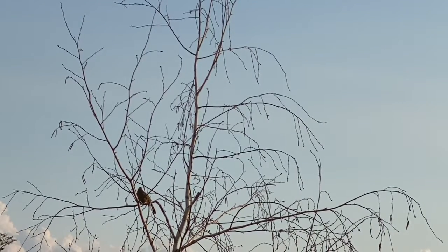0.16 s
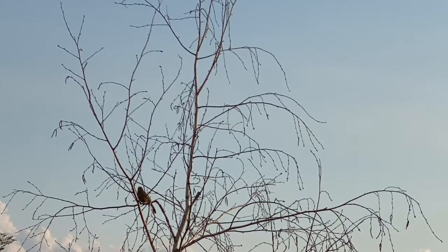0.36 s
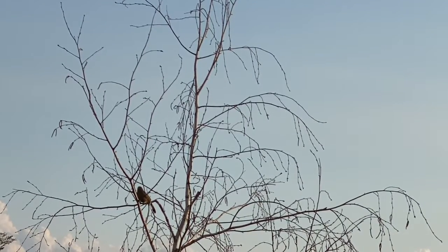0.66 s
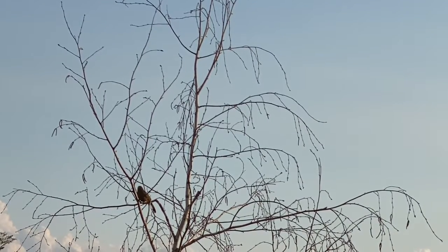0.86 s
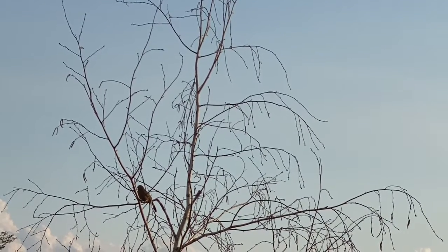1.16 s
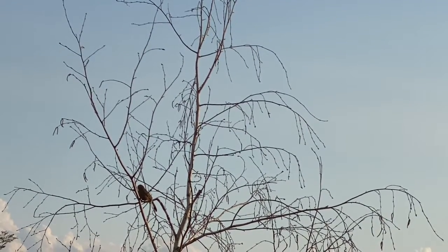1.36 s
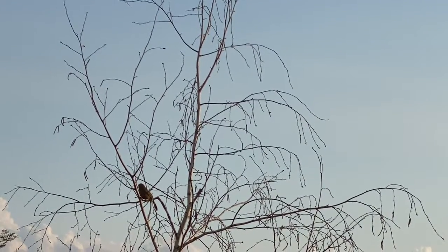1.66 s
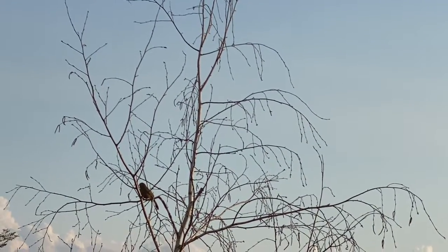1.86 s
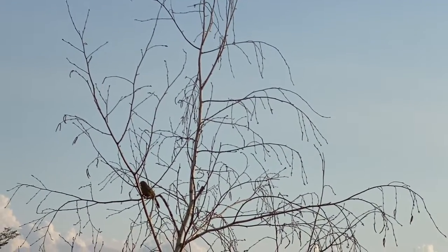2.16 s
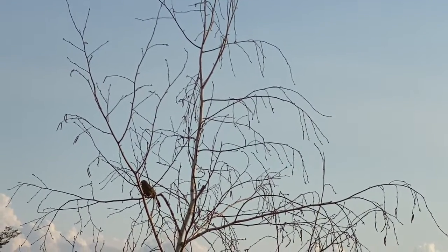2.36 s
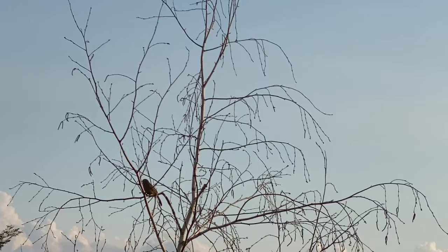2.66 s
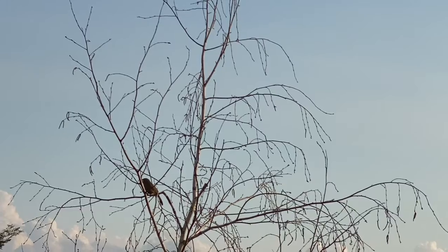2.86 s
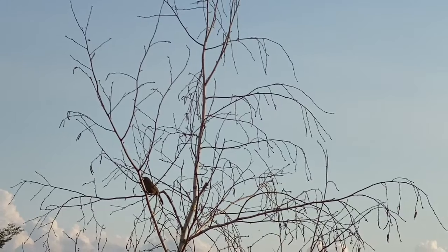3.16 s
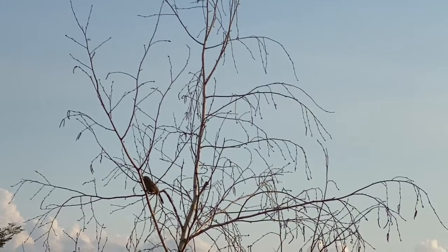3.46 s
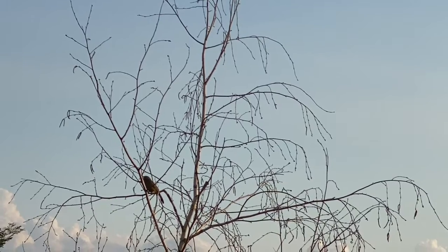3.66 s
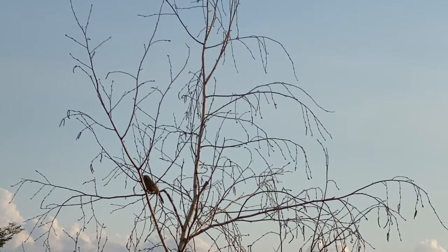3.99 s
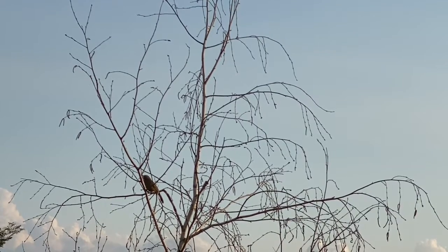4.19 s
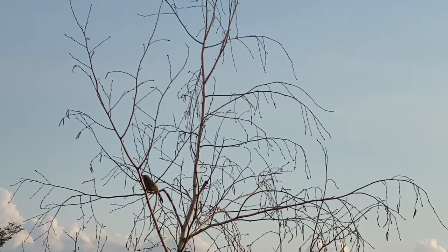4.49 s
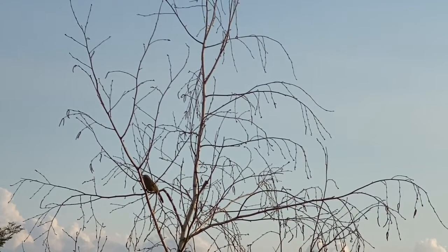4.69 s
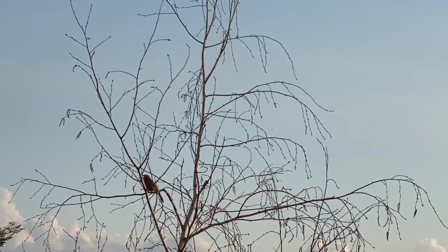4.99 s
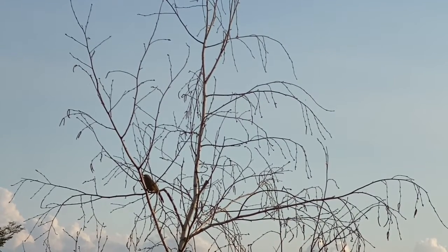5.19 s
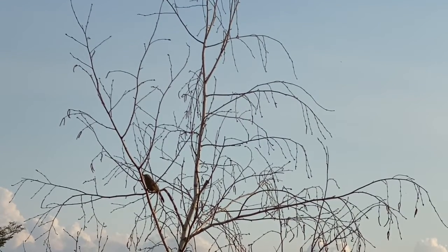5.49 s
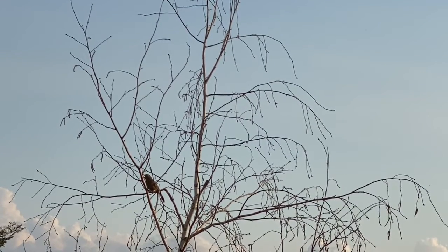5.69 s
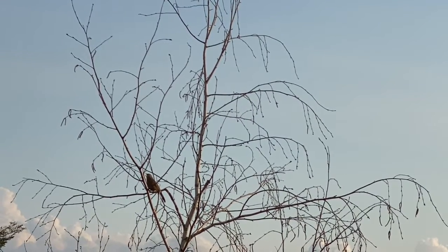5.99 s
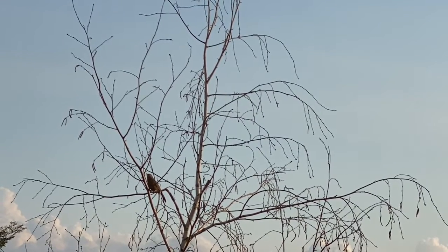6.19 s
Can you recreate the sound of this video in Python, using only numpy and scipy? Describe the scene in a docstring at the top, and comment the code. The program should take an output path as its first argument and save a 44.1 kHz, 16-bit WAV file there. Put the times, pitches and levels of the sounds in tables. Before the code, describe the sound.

A songbird in a bare tree sings one growing bout of buzzes, slurs and warbles, then loud clear whistles, over faint low traffic rumble.

```python
"""Songbird in a bare tree

One bout grows louder: two buzzes, six slur-slur-warble phrases, two quavers around a buzz, then long whistles
and steep down-sweeps. Each note is a near sine drawn along a pitch curve, with overtones and trills. Ground,
branches and nearby walls echo it. Noise makes the far traffic rumble and a single twig tick; unsteady tones
make the far engines, and thin glides the other birds and a faint high whine."""
import sys
import numpy as np
from scipy import signal
from scipy.fft import rfft, irfft, next_fast_len
from scipy.io import wavfile
from scipy.ndimage import uniform_filter1d

SR = 44100
rng = np.random.default_rng(int(sys.argv[2]) if len(sys.argv) > 2 else 0)


def inscribe(sig):
    """Save sig as 16-bit PCM at rate SR to the path in sys.argv[1].

    A 1-D sig is mono; a 2-D sig holds one channel per row.
    Samples are clipped to [-1, 1] before scaling.
    """
    pcm = np.round(np.clip(np.atleast_2d(sig).T, -1, 1) * 32767)
    wavfile.write(sys.argv[1], SR, pcm.astype(np.int16))


N = 279593
TIME = np.arange(N) / SR

# Source levels are set before swells, throbs and flutter; birds and twig also before echoes and port colour.

# distant traffic and hiss: (frequency [Hz], relative density [dB])
AIR_SPECTRUM = [(15, -44.5), (25, -9), (82, -5.5), (129, -8), (297, -14), (359, -14), (523, -18.5),
                (1110, -30), (2630, -26), (3260, -34.5), (6550, -45), (7300, -45), (11800, -84.5),
                (13500, -47.5), (15500, -44)]
# width of that background: (frequency [Hz], side relative to mid [dB])
AIR_WIDTH = [(60, -23), (200, -8), (400, -8.5), (800, -0.5), (2400, -7.5), (15000, -21.5)]
# idling engines far off, each fading over the last second before its end:
# (pitch [Hz], level [dB], time by which it has faded [s])
IDLING_ENGINES = [(67.5, -61.5, 9), (193, -70.5, 3.7), (295, -66.5, 3.4)]
# a distant engine swells and eases off:
# (start [s], end [s], starting pitch [Hz], final pitch [Hz], level [dB])
REVVING_ENGINES = [(1.207, 1.718, 252, 218.7, -58), (3.167, 3.328, 238, 233, -58.5),
                   (3.272, 3.737, 222, 183.5, -50.5), (4.315, 4.59, 240, 224, -58.5),
                   (4.797, 5.162, 198, 206, -57)]
# faint high sounds: a thin, nearly steady whine near 6.5 kHz, then calls of other birds: # (start [s], end [s],
# starting pitch [Hz], final pitch [Hz], level [dB], pitch scatter [ratio])
FAINT_HIGH_SOUNDS = [(0.729, 1.391, 6500, 6820, -89.5, 0), (1.631, 1.764, 6760, 4280, -64, 0.05),
                     (3.558, 3.714, 3820, 4790, -67.5, .05), (3.982, 4.116, 4210, 6580, -65.5, 0.14),
                     (4.089, 4.323, 6800, 6250, -76, .05), (5.664, 5.776, 3470, 3150, -68.5, 0.06),
                     (6.152, 6.344, 3620, 3930, -66, 0.02)]

# early echoes off ground and branches: (delay [s], level [dB])
EARLY_ECHOES = [(.0069, -13), (.0139, -18), (.0172, -18), (.0277, -21)]
# treble colour of the microphone ports; the first and last gains carry on outwards: (frequency [Hz], gain [dB])
PORT_COLOUR = [(4500, 4.5), (5400, -3.5), (7500, 2.5), (8500, -2), (10800, 7), (12300, -11.5),
               (13700, 11.5), (15500, 1.5)]

# overtones of pure whistles, quavers, squeaks and faint high sounds: (multiple of the pitch [ratio], level
# [dB])
CLEAN_OVERTONES = [(2, -31.5), (3, -37), (4, -55), (5, -47.5), (6, -41), (7, -40)]
# overtones of buzzes, slurs and warbles: (multiple of the pitch [ratio], level [dB])
SOFT_OVERTONES = [(2, -30), (3, -42), (4, -56), (5, -46.5), (6, -52)]
# overtones of forced notes, where half multiples join in: (multiple of the pitch [ratio], level [dB])
FORCED_OVERTONES = [(1.5, -34), (2, -25.5), (2.5, -39.5), (3, -33), (3.5, -47), (4, -45)]

# short falling slurs: (start [s], end [s], starting pitch [Hz], level [dB])
SLURS = [(.843, .89, 2610, -54.5), (.943, 1.028, 2947, -48), (1.212, 1.27, 3060, -47),
         (1.383, 1.467, 3020, -48), (1.651, 1.713, 3217, -45), (1.767, 1.843, 3000, -45),
         (2.086, 2.156, 3130, -44), (2.217, 2.298, 2923, -45), (2.49, 2.543, 3160, -41),
         (2.603, 2.696, 2938, -42.5), (2.902, 2.961, 3228, -38.5), (3.024, 3.097, 3040, -39)]
# buzzes: (start [s], end [s], starting pitch [Hz], top pitch [Hz], sag after the top [0-1], trill rate [Hz],
# trill depth at start [Hz], trill depth at end [Hz], level [dB])
BUZZES = [(.165, .27, 1835, 2730, .1, 182.3, 150, 220, -44.5),
          (.452, .579, 1864, 2588, .08, 159.2, 149, 283, -43),
          (3.702, 3.857, 2710, 3410, 0.17, 131.3, 180, 22, -32.5)]
# warbles: (start [s], end [s], starting pitch [Hz], top pitch [Hz], sag after the top [0-1],
# final trill depth [Hz], level [dB])
WARBLES = [(1.02, 1.141, 2400, 3744, 0.17, 110, -47), (1.461, 1.604, 2625, 3767, 0.13, 25, -44),
           (1.846, 2.016, 2490, 3872, 0.21, 30, -43.5), (2.295, 2.432, 2586, 3658, 0.07, 140, -42),
           (2.693, 2.842, 2720, 3696, 0.06, 130, -41.5), (3.096, 3.266, 2433, 3646, 0.09, 80, -37)]
# quavers: (start [s], end [s], starting pitch [Hz], trill rate at start [Hz], trill rate at end [Hz], level [dB])
QUAVERS = [(3.328, 3.634, 3135, 13.5, 36.5, -35.5), (3.911, 4.199, 3019, 23.5, 26.75, -35.5)]
# rising whistles: (start [s], end [s], starting pitch [Hz], pitch aimed at [Hz], level [dB])
RISES = [(4.726, 4.839, 2320, 3042, -39), (5.558, 5.67, 1775, 2877, -37)]
# high held whistles: (start [s], end [s], reference pitch [Hz], level [dB])
HOLDS = [(4.88, 5.046, 3822, -37), (5.733, 5.843, 4547, -35.5)]
# long arched whistles: (start [s], end [s], starting pitch [Hz], top pitch [Hz], level [dB])
ARCHES = [(5.152, 5.377, 2417, 2999, -34), (5.983, 6.214, 2810, 3044, -33)]
# low whistles: (start [s], end [s], starting pitch [Hz], level [dB], fade [dB/s])
LOWS = [(4.334, 4.567, 2383, -39, 24), (5.422, 5.564, 2020, -39.5, 162), (6.253, 6.345, 2078, -36, 134)]
# steep down-sweeps: (start [s], end [s], starting pitch [Hz], level [dB], level of the opening squeak [dB])
SWEEPS = [(4.64, 4.693, 4145, -40, -72), (5.078, 5.126, 4215, -36, -48.5), (5.88, 5.935, 4385, -33, -51.5)]

# Swells below run from the start to the end of a note [dB]; drops are shares of the pitch.
FULL_EFFORT_DB = -35  # note level at which overtones have their listed strength
SLUR_DROP, SLUR_SETTLE_S, SLUR_SWELL_DB = .235, .07, (-2.5, 0.5, -6.5)
BUZZ_CREST, BUZZ_SWELL_DB = .58, (-14.5, -2, 0, -1)  # crest: share of the length at which it tops out
WARBLE_CLIMB_S, WARBLE_SWELL_DB = .08, (-1, -0.5, .5, 3)
# the warble's trill quickens from start to end, and narrows from a wide opening swing
WARBLE_RATE_HZ, WARBLE_DEPTH_HZ, WARBLE_NARROW_S = (66, 89), 322, 0.13
QUAVER_DROP, QUAVER_SETTLE_S, QUAVER_SWELL_DB = .225, .27, (-4.5, -2, -3, -6.5)
QUAVER_DEPTH_HZ = (125.7, 145.3)  # trill depth at start and end
RISE_S, RISE_SWELL_DB = .052, (-11.5, -1, 1, -1.5)  # time constant of the rise
# a held whistle settles from above, then lifts a little: ratios to its reference pitch
HOLD_SHAPE, HOLD_SWELL_DB = (1.112, 1.035, 1, 1.018, 1.025), (-7.5, 0, 2, 3.5)
ARCH_CLIMB_S, ARCH_FALL_S, ARCH_DROP, ARCH_SWELL_DB = .056, 0.13, .243, (-7, 0, -0.5, -3, -8)
LOW_ATTACK_S, LOW_ONSET_DB, LOW_FALL_S, LOW_DROP = 0.031, -11, .133, .188
SWEEP_DROP, SWEEP_BEND, SWEEP_SWELL_DB = 0.38, 1.25, (-26.5, -3.5, 3.5, -4)
SQUEAK_HZ, SQUEAK_LEAD_S, SQUEAK_S = 5050, 0.0057, 0.016
FAR_SWELL_DB = (-4, 3, -3)


def undb(db):
    """Amplitude ratio of a level in dB."""
    return 10 ** (np.asarray(db) / 20)


def unit(x):
    """Scale a sound to rms 1."""
    return x / np.sqrt(np.mean(x ** 2))


def smooth(noise, size):
    """Noise averaged twice over some samples; rms 1."""
    return unit(uniform_filter1d(uniform_filter1d(noise, size), size))


def walk(rate):
    """Random levels held 1 / rate s and slewed twice; spread near 1."""
    hold_samples = int(SR / rate)
    steps = np.repeat(rng.standard_normal(N // hold_samples + 1), hold_samples)
    return 1.29 * uniform_filter1d(uniform_filter1d(steps, hold_samples), hold_samples)[:N]


def on_log_axis(hz, points):
    """Read (frequency [Hz], value) points on a log-frequency axis."""
    at, value = np.transpose(points)
    return np.interp(np.log(hz + 1), np.log(at), value)


def colour(x, points):
    """Filter a sound by a (frequency [Hz], gain [dB]) spectrum."""
    size = next_fast_len(len(x))
    gain = undb(on_log_axis(np.fft.rfftfreq(size, 1 / SR), points))
    return irfft(rfft(x, size) * gain, size)[:len(x)]


def add(track, start, sound):
    """Mix a sound into the track from a given time."""
    i = int(start * SR)
    track[i:i + len(sound)] += sound[:len(track) - i]


def clock(length_s):
    """Time since the start of a sound."""
    return np.arange(int(length_s * SR)) / SR


def spread(t, values):
    """Values spread evenly over a note and joined by straight lines."""
    return np.interp(t, np.linspace(0, t[-1], len(values)), values)


def settle(t, time_s):
    """From 0 to 1, fast at first and then levelling out."""
    return 1 - (1 - np.minimum(t / time_s, 1)) ** 2


def ease(t, time_s):
    """From 0 to 1, gentle at both ends."""
    return np.sin(np.pi / 2 * np.clip(t / time_s, 0, 1)) ** 2


def air(level_db=-57, swell_db=1.14):
    """Traffic rumble and a hiss that rises above 13 kHz: coloured noise, gently swelling, the deep bass nearly
    mono."""
    mid, side = (unit(colour(rng.standard_normal(N), AIR_SPECTRUM)) for _ in range(2))
    side = colour(side, AIR_WIDTH)
    return undb(level_db + swell_db * walk(3.496)) * np.array([mid + side, mid - side])


def unsteady_tone(hz, db, waver=.007, flutter_db=3):
    """A sine whose pitch wavers and whose level flutters at random."""
    phase = 2 * np.pi * np.cumsum(hz * (1 + waver * walk(25))) / SR
    return np.sqrt(2) * undb(db + flutter_db * walk(11)) * np.sin(phase)


def engines():
    """Far engines: only their lowest lines carry, wavering on the way."""
    out = sum(unsteady_tone(hz, db) * np.clip(until - TIME, 0, 1) for hz, db, until in IDLING_ENGINES)
    for start, end, from_hz, to_hz, db in REVVING_ENGINES:
        along = np.clip((TIME - start) / (end - start), 0, 1)
        tone = unsteady_tone(from_hz + (to_hz - from_hz) * along, db)
        out = out + tone * np.sin(np.pi * along) ** 2
    return out


def note(hz, db, flick=0, jitter=.003, rasp=0, partials=CLEAN_OVERTONES):
    """One note of the syrinx: a near sine that follows a pitch and a level, with overtones that grow with effort."""
    t = np.arange(len(hz)) / SR
    left = t[-1] - t
    wobble, flutter = rng.standard_normal((2, SR))
    # the membranes slacken as the note stops, so the pitch flicks down
    unsteadiness = 1 + jitter * smooth(wobble, size=50)[:len(t)]
    hz = hz * unsteadiness * (1 - flick * np.exp(-left / 0.0034))
    phase = 2 * np.pi * np.cumsum(hz) / SR
    # overtones past the top of the digital band are left out
    overtones = sum(undb(part_db) * (k * hz < SR / 2) * np.sin(k * phase) for k, part_db in partials)
    effort = undb(0.41 * (db - FULL_EFFORT_DB))
    # uneven closures smear the overtones into a rasp and leave the pitch itself clean
    roughness = 1 + rasp * smooth(flutter, size=20)[:len(t)]
    envelope = undb(db) * ease(t, 0.0087) * ease(left, .007)
    return np.sqrt(2) * envelope * (np.sin(phase) + overtones * effort * roughness)


def faint_high_sounds():
    """Faint thin glides, each pitch levelling out towards its end."""
    calls = np.zeros(N)
    for start, end, from_hz, to_hz, db, scatter in FAINT_HIGH_SOUNDS:
        t = clock(end - start)
        hz = from_hz + (to_hz - from_hz) * settle(t, t[-1])
        add(calls, start, note(hz, db + spread(t, FAR_SWELL_DB), jitter=scatter))
    return calls


def twig(at=1.608, db=-44, decay_s=0.0015):
    """A dry tick: coloured noise that dies away within milliseconds."""
    t = np.arange(SR // 20) / SR
    crack = colour(rng.standard_normal(len(t)), [(400, 0), (1300, 15.0), (2500, 19), (5000, 13.0), (15000, -18)])
    tick = np.zeros(N)
    add(tick, at, undb(db) * unit(crack) * np.exp(-t / decay_s))
    return tick


def crest(t, from_hz, top_hz, climb_s, sag, bend=1.8):
    """Pitch that climbs to a top and then sags by a share of it."""
    climb = np.sin(np.pi / 2 * np.minimum(t / climb_s, 1))
    after = np.maximum(t - climb_s, 0) / (t[-1] - climb_s)
    return (from_hz + (top_hz - from_hz) * climb) * (1 - sag * after ** bend)


def trill(t, rates_hz, lean=0, uneven=0.38):
    """Strokes of the trill muscle, used to pull pitch and loudness together; their depth varies at random."""
    turn = 2 * np.pi * np.cumsum(spread(t, rates_hz)) / SR
    stroke = -np.cos(turn + lean * (np.cos(turn) - 1))
    return stroke * (1 + uneven * smooth(rng.standard_normal(SR), size=300)[:len(t)])


def buzz(t, from_hz, top_hz, sag, rate_hz, first_depth_hz, last_depth_hz, db, throb_db_per_hz=0.0063, burr=.19):
    """An arch trilled so fast that it sounds rough; the wider the trill, the less steady the pitch."""
    depth_hz = spread(t, (first_depth_hz, last_depth_hz))
    swing_hz = depth_hz * trill(t, (rate_hz, rate_hz))
    hz = crest(t, from_hz, top_hz, BUZZ_CREST * t[-1], sag, bend=2)
    level_db = db + spread(t, BUZZ_SWELL_DB) + throb_db_per_hz * swing_hz
    return note(hz + swing_hz, level_db, flick=.12, jitter=burr * depth_hz / hz, rasp=0.89, partials=SOFT_OVERTONES)


def slur(t, pitch_hz, db):
    """A short soft fall that levels out."""
    hz = pitch_hz * (1 - SLUR_DROP * settle(t, SLUR_SETTLE_S))
    return note(hz, db + spread(t, SLUR_SWELL_DB), flick=0.0096, jitter=0.0064, rasp=.4, partials=SOFT_OVERTONES)


def warble(t, from_hz, top_hz, sag, last_depth_hz, db, throb_db=1.4):
    """A trilled climb that steadies at the top and flicks off."""
    stroke = trill(t, WARBLE_RATE_HZ, lean=-0.11, uneven=0.2)
    depth_hz = WARBLE_DEPTH_HZ + (last_depth_hz - WARBLE_DEPTH_HZ) * ease(t, WARBLE_NARROW_S)
    hz = crest(t, from_hz, top_hz, WARBLE_CLIMB_S, sag) + depth_hz * stroke
    level_db = db + spread(t, WARBLE_SWELL_DB) + throb_db * stroke
    return note(hz, level_db, flick=0.33, jitter=.007, rasp=0.55, partials=SOFT_OVERTONES)


def quaver(t, pitch_hz, first_rate_hz, last_rate_hz, db, throb_db=2.5):
    """A long fall with a slow, widening trill."""
    stroke = trill(t, (first_rate_hz, last_rate_hz), lean=0.25, uneven=.15)
    fall_hz = pitch_hz * (1 - QUAVER_DROP * settle(t, QUAVER_SETTLE_S))
    hz = fall_hz + spread(t, QUAVER_DEPTH_HZ) * stroke
    return note(hz, db + spread(t, QUAVER_SWELL_DB) + throb_db * stroke, flick=.06, jitter=.004, rasp=.4)


def forced(hz, db):
    """A hard-blown note whose cycles alternate strong and weak, which adds half multiples of the pitch."""
    return note(hz, db, flick=.22, jitter=.003, rasp=.25, partials=FORCED_OVERTONES)


def rise(t, from_hz, to_hz, db):
    """A hard-blown scoop up towards a pitch."""
    return forced(to_hz + (from_hz - to_hz) * np.exp(-t / RISE_S), db + spread(t, RISE_SWELL_DB))


def hold(t, pitch_hz, db):
    """A hard-blown high note that settles from above, its pitch a smooth curve through the shape's ratios."""
    shape = np.polyfit(np.linspace(0, 1, len(HOLD_SHAPE)), HOLD_SHAPE, len(HOLD_SHAPE) - 1)
    return forced(pitch_hz * np.polyval(shape, t / t[-1]), db + spread(t, HOLD_SWELL_DB))


def squeak(db):
    """A rough instant before the membranes lock into a sweep."""
    return note(np.full_like(clock(SQUEAK_S), SQUEAK_HZ), db, jitter=0.063)


def sweep(t, pitch_hz, db):
    """A hard-blown plunge, falling ever faster."""
    return forced(pitch_hz * (1 - SWEEP_DROP * (t / t[-1]) ** SWEEP_BEND), db + spread(t, SWEEP_SWELL_DB))


def pure(hz, db):
    """A clean, easy whistle."""
    return note(hz, db, flick=.05, jitter=.003, rasp=.35)


def arch(t, from_hz, top_hz, db):
    """A pure whistle that climbs briefly and glides a long way down."""
    climb_hz = from_hz + (top_hz - from_hz) * settle(t, ARCH_CLIMB_S)
    hz = climb_hz * (1 - ARCH_DROP * ease(t - ARCH_CLIMB_S, ARCH_FALL_S))
    return pure(hz, db + spread(t, ARCH_SWELL_DB))


def low(t, pitch_hz, db, fade_db_per_s):
    """A low pure whistle that swells in, then fades, its pitch sinking from the start."""
    attack_db = LOW_ONSET_DB * np.maximum(1 - t / LOW_ATTACK_S, 0)
    fade_db = fade_db_per_s * np.maximum(t - LOW_ATTACK_S, 0)
    return pure(pitch_hz * (1 - LOW_DROP * ease(t, LOW_FALL_S)), db + attack_db - fade_db)


def songbird():
    """The bout, each kind of note sung by its own rule."""
    song = np.zeros(N)
    for table, sing in ((BUZZES, buzz), (SLURS, slur), (WARBLES, warble), (QUAVERS, quaver),
                        (RISES, rise), (HOLDS, hold), (ARCHES, arch), (LOWS, low)):
        for start, end, *row in table:
            add(song, start, sing(clock(end - start), *row))
    for start, end, pitch_hz, db, squeak_db in SWEEPS:
        add(song, start - SQUEAK_LEAD_S, squeak(squeak_db))
        add(song, start, sweep(clock(end - start), pitch_hz, db))
    return song


def scatter(db, t60):
    """Dense small reflections: coloured noise that builds quickly and dies away by 60 dB in t60 s."""
    t = np.arange(SR) / SR
    tail = colour(rng.standard_normal(SR), [(3500, 0.5), (8000, 4.5), (15000, -1.5)])
    fade = np.exp(-np.log(1000) * t / t60) * np.minimum(t / 0.0099, 1)
    return undb(db) * tail * fade / np.sqrt(np.sum(fade ** 2))


def surroundings(x, near_db=-12, near_t60=.15, far_db=-19.5, far_t60=.85, side_db=-12):
    """Direct sound, a few clear echoes, quick scatter from the tree and a thin tail from further off."""
    direct = np.zeros(SR)
    direct[0] = 1
    for delay, db in EARLY_ECHOES:
        direct[int(delay * SR)] += undb(db)
    mid, side = (scatter(near_db, near_t60) + scatter(far_db, far_t60) for _ in range(2))
    side = undb(side_db) * side
    return np.array([signal.fftconvolve(x, direct + mid + sign * side)[:N] for sign in (1, -1)])


def ports(pair, lag_s=2.3e-5):
    """The microphone ports colour the sound, which reaches the right one a little later."""
    size = next_fast_len(N)
    # a phase slope delays by a fraction of a sample
    delay = np.exp(-2j * np.pi * np.fft.rfftfreq(size, 1 / SR) * lag_s)
    late_right = irfft(rfft(pair[1], size) * delay, size)[:N]
    return np.array([colour(channel, PORT_COLOUR) for channel in (pair[0], late_right)])


def scene():
    """Birds, faint high sounds and twig in their surroundings, over the distant traffic."""
    return ports(surroundings(songbird() + faint_high_sounds() + twig())) + air() + engines()


def record(dry, top_hz=15750):
    """The recorder cuts the top with a steep low-pass."""
    return signal.sosfilt(signal.ellip(10, .2, 70, top_hz, fs=SR, output="sos"), dry)


dry = scene()
out = record(dry)
inscribe(out)
```